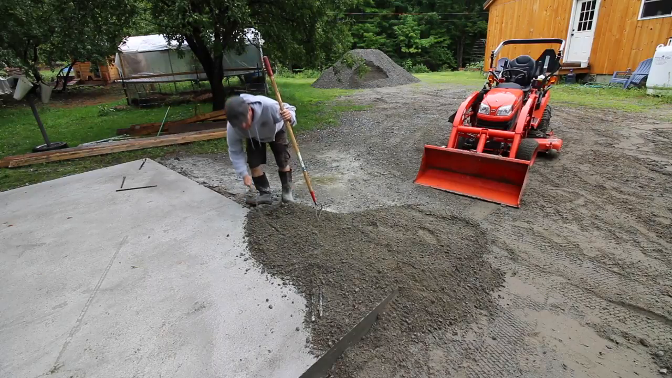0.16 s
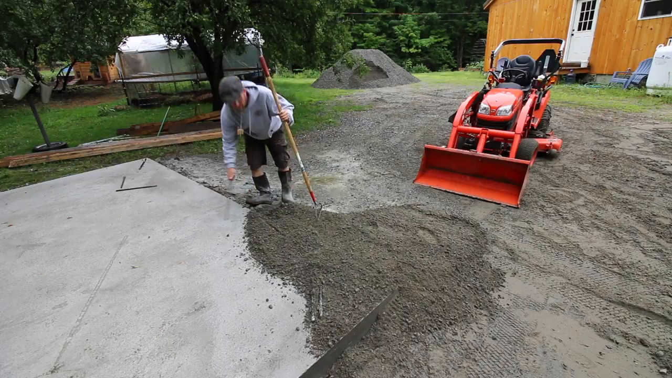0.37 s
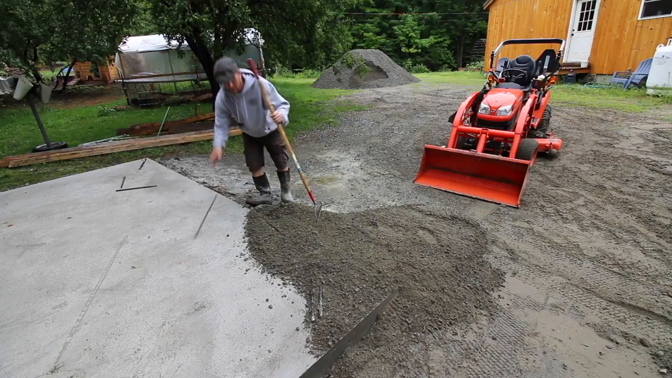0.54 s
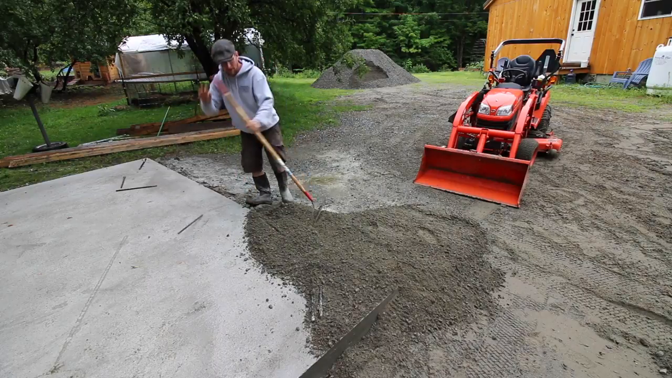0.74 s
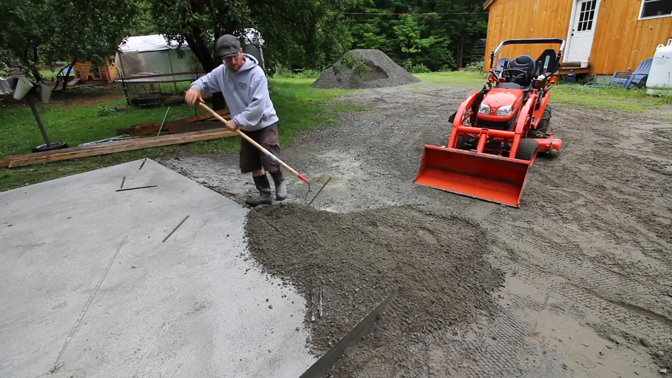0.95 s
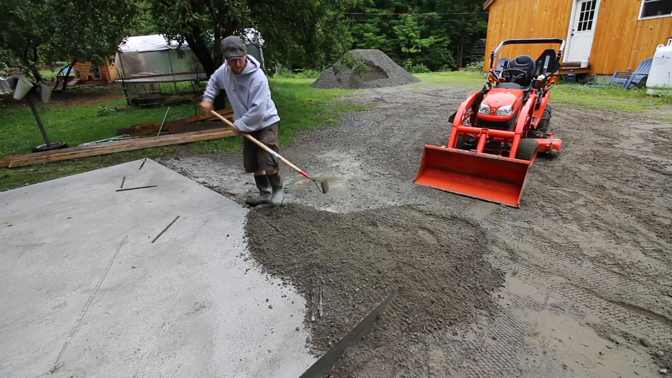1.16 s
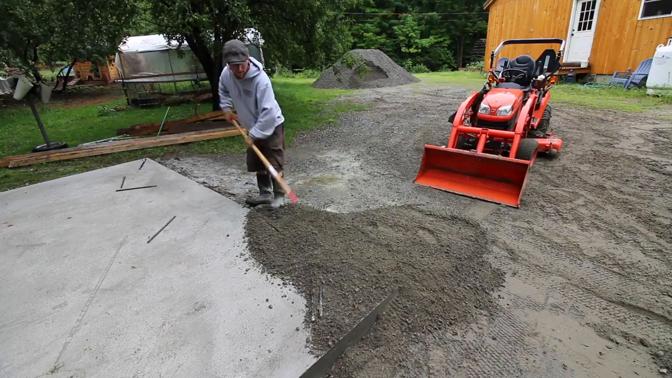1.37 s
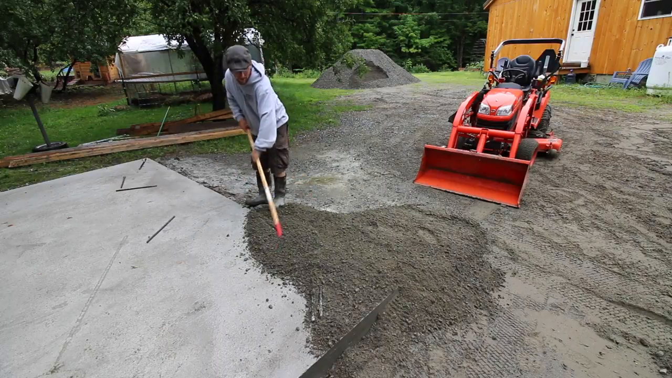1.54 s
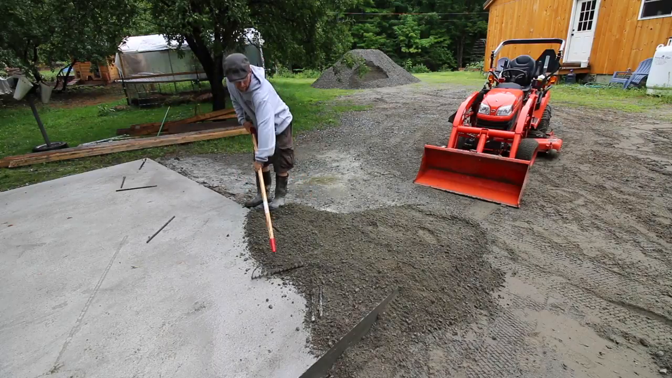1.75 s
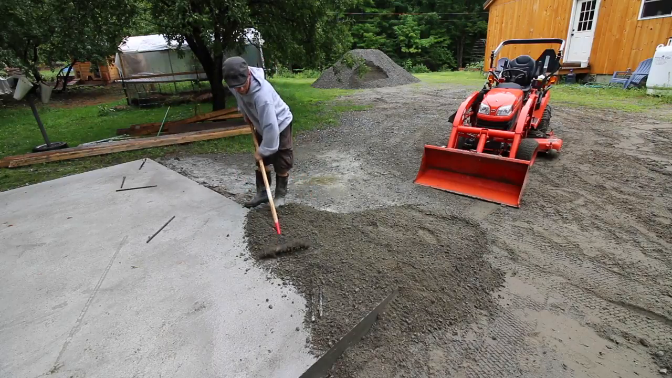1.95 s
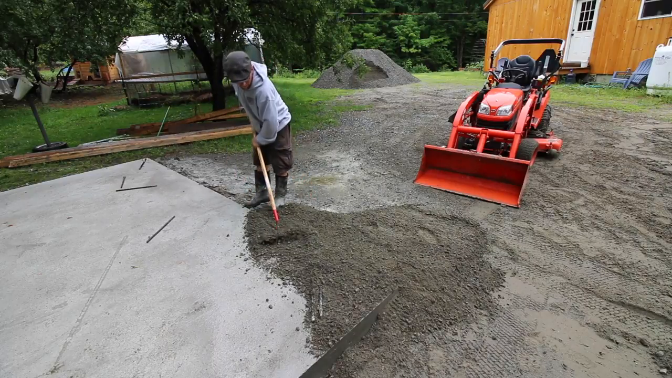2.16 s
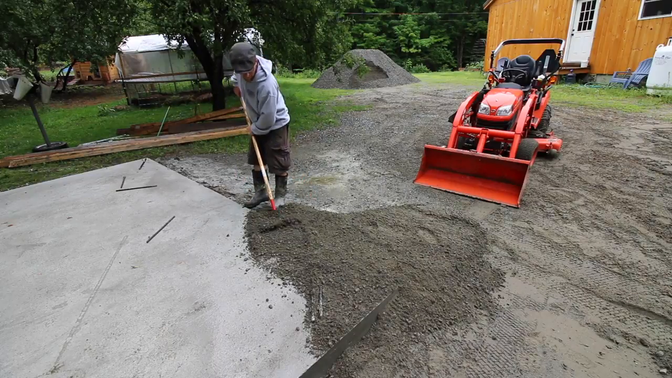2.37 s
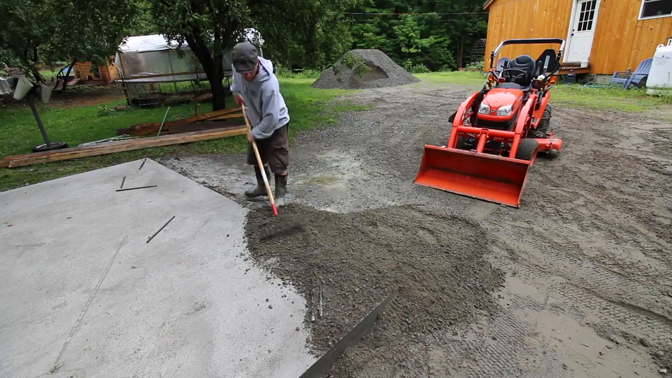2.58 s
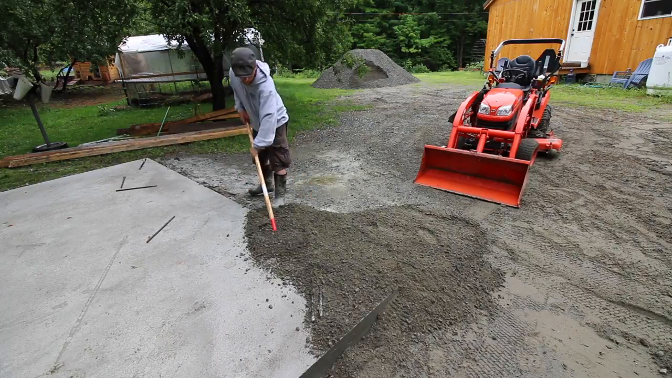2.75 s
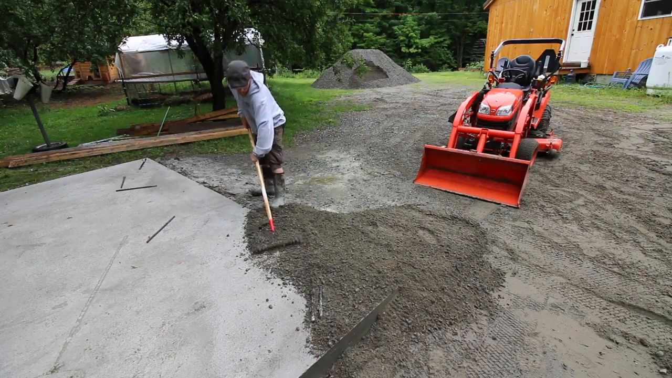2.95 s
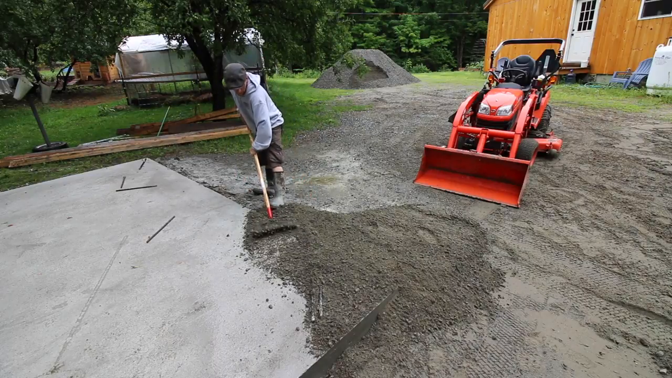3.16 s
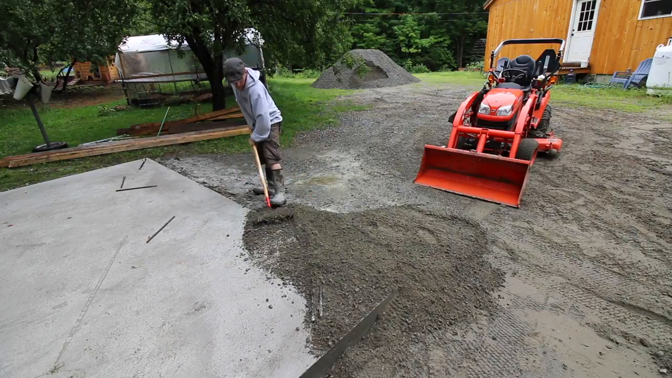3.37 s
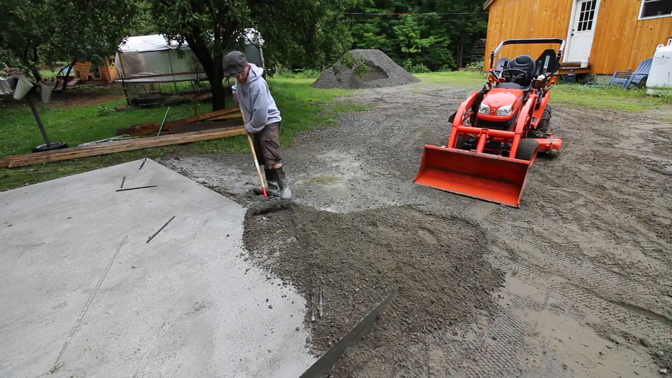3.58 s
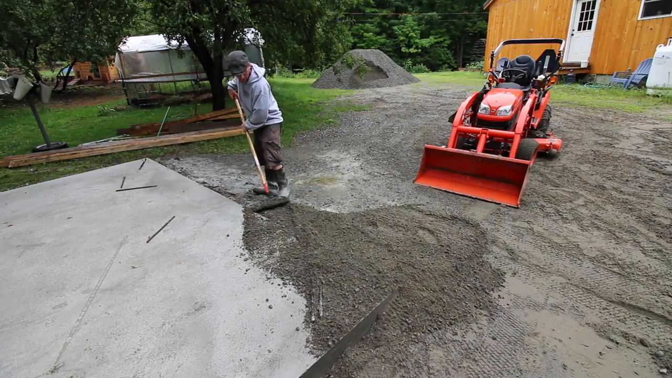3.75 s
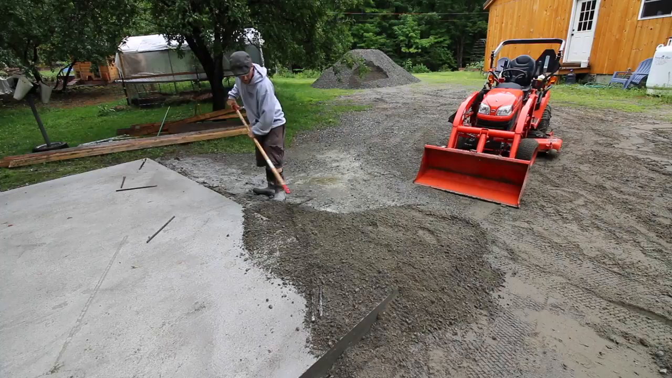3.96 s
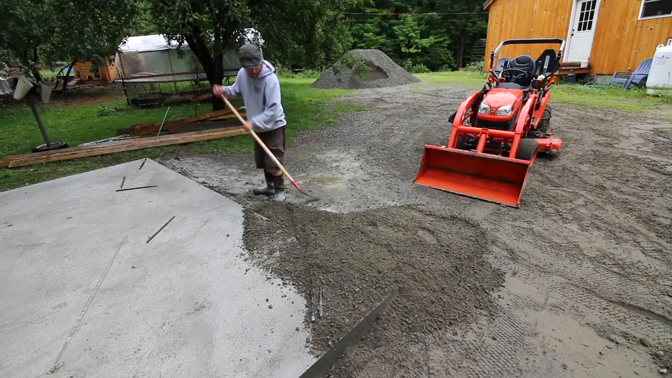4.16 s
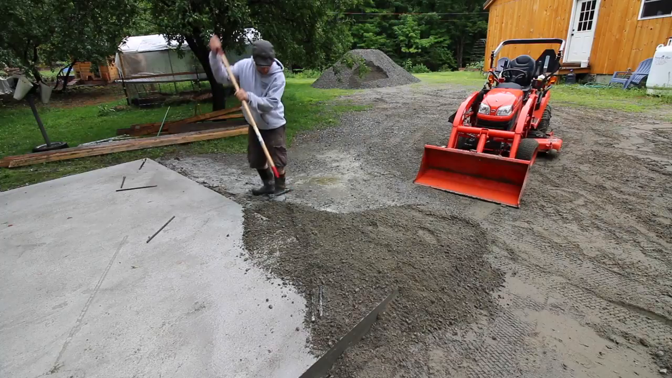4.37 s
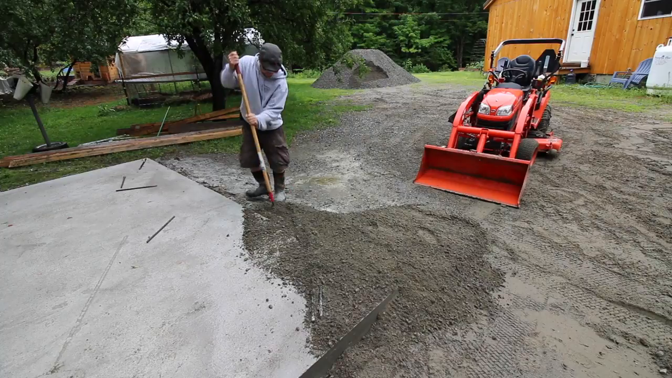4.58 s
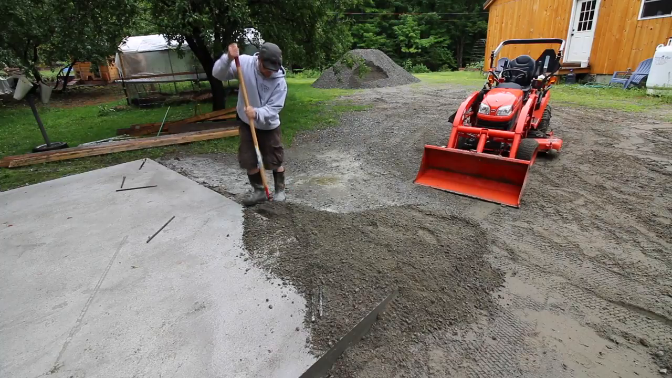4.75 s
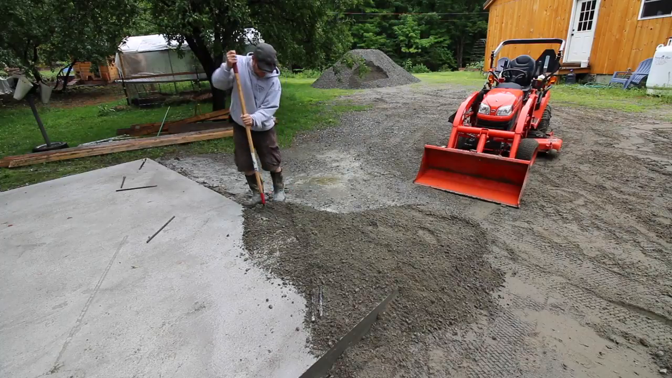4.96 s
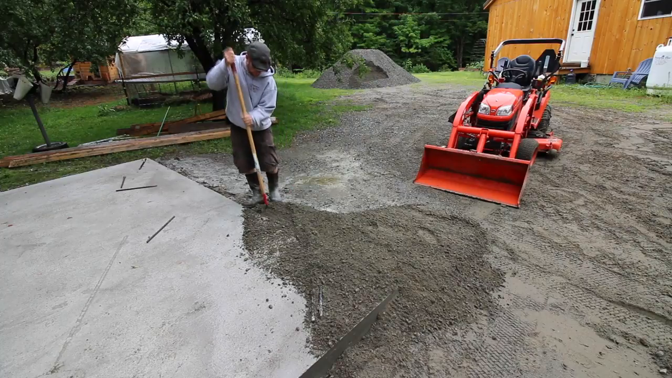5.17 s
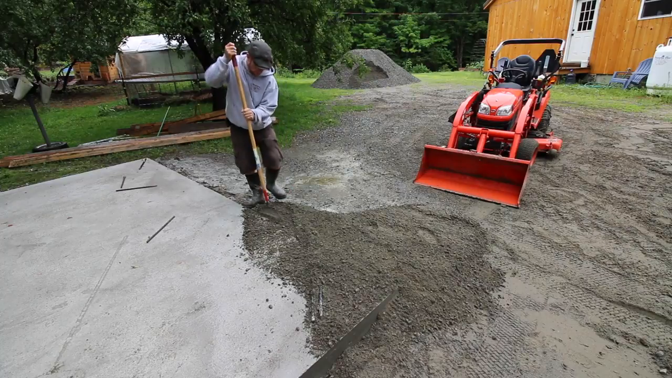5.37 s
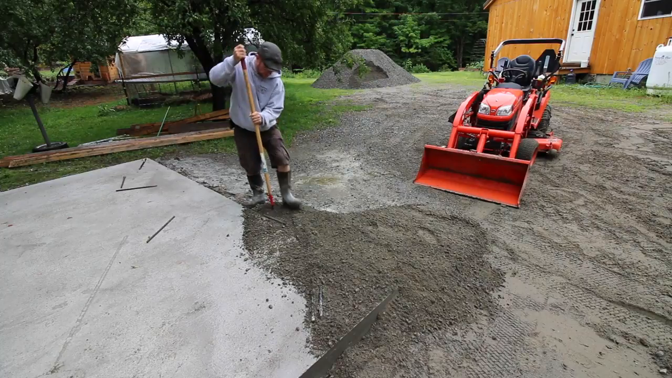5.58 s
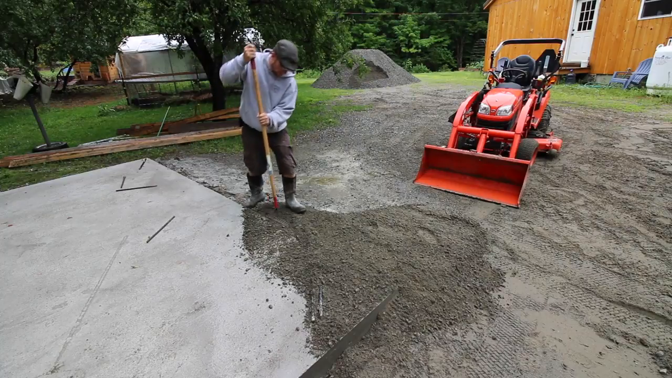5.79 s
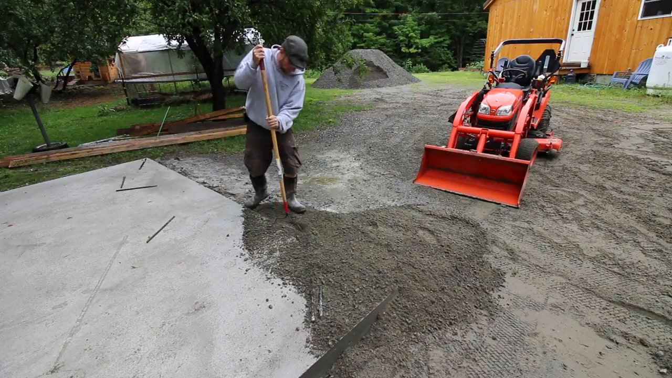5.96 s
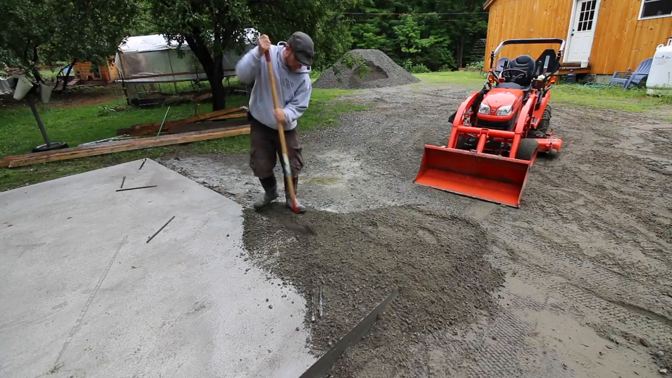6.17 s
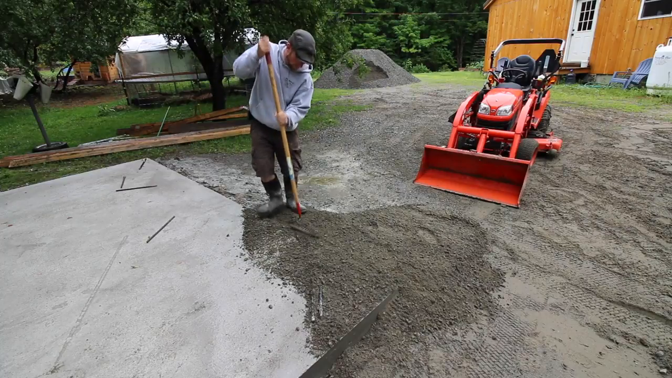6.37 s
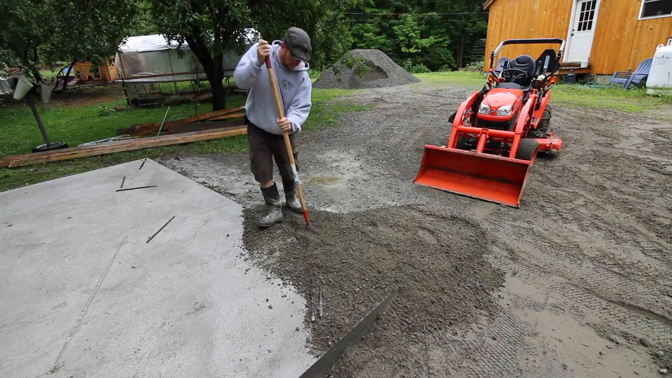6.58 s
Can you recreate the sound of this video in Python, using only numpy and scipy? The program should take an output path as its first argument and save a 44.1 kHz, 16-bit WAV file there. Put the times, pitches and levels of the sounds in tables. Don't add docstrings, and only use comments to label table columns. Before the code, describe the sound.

In a quiet yard, a steel rod is tossed onto concrete, landing with a bright clang and several quick bounces, its ring wavering as it spins. Boots shuffle on gravel. A steel rake then drags twice through loose stones, gritty and clattering, with tines ringing. After a short shuffle come uneven tamping blows, crunchy with dull metallic clanks. Close stereo from a few metres, over a soft airy hush.

```python
import sys
import numpy as np
from scipy import signal
from scipy.fft import rfft, irfft
from scipy.io import wavfile
from scipy.ndimage import uniform_filter1d

SR = 44100
rng = np.random.default_rng(int(sys.argv[2]) if len(sys.argv) > 2 else 0)


def level_to_linear(level):
    exponent = np.asarray(level, float) / 20
    return 10 ** exponent


def put_to_file(sound):
    columns = np.atleast_2d(sound).T
    safe = np.clip(columns, -1, 1)
    whole_steps = np.round(safe * 32767)
    wavfile.write(sys.argv[1], SR, whole_steps.astype(np.int16))


N = 292118


def curve(table, at, log=False):
    x, *columns = np.transpose(table)
    warp = np.log if log else np.asarray
    return np.array([np.interp(warp(at), warp(x), column) for column in columns])


def colour(x, table, lag_s=0.):
    hz = np.fft.rfftfreq(2048, 1 / SR) + 1
    cepstrum = irfft(np.log(level_to_linear(curve(table, hz, True)[0])))
    cepstrum[1:1024] *= 2
    cepstrum[1025:] = 0
    response = irfft(np.exp(rfft(cepstrum) - 2j * np.pi * hz * lag_s))
    return signal.fftconvolve(x, response)[:N]


def unit(x):
    return x / np.sqrt(np.mean(x ** 2))


def band(x, lo_hz, hi_hz):
    return signal.sosfilt(signal.butter(2, [lo_hz, hi_hz], "band", fs=SR, output="sos"), x)


def grains(rate, spread_db, dust):
    chance, luck = rng.random((2, N))
    size = level_to_linear(-spread_db * np.log(1 - .97 * luck)) * (chance < rate / SR)
    return (unit(size) + dust) * rng.standard_normal(N)


def flicker(rate, depth_db):
    hold = int(SR / rate)
    steps = np.repeat(rng.standard_normal(N // hold + 1), hold)
    return level_to_linear(depth_db * uniform_filter1d(steps, hold // 2)[:N])


def knocks(table, t60, width, grit):
    out = np.zeros(N + 4096)
    t = np.arange(4096) / SR
    for s, db, hz in table:
        push = rng.standard_normal(len(t)) * level_to_linear(-60 * t / t60) * grit
        push[0] += 4.
        lump = signal.iirpeak(hz, 1 / width, SR)
        knock = signal.lfilter(*lump, signal.lfilter(*lump, push))
        start = int(s * SR)
        out[start:start + len(t)] += level_to_linear(db) * knock / np.abs(knock).max()
    return out[:N]


def yard_air():
    # (f/Hz, level/dB per Hz)
    hush = [(12, -44), (20, -11.5), (117, 0.5), (794, -3), (913, -4), (994, 1), (1140, -3.5), (1840, -4.5),
            (5360, -20), (9410, -32), (14300, -41.5), (16500, -36)]
    breeze = flicker(6, 1.1)
    return [unit(colour(rng.standard_normal(N), hush)) * level_to_linear(-55.5) * breeze for _ in range(2)]


def shuffles(t):
    # (t/s, length/s, rattle level/dB, level of packed gravel giving way/dB)
    steps = [(0, 0.17, -50, -52.5), (0.528, 0.25, -48.5, -54), (0.84, 0.325, -44, -63),
             (1.222, 0.38, -52.5, -46), (1.584, 0.25, -55, -56), (2.477, 0.41, -52.5, -62),
             (3.768, 0.27, -46.5, -46), (4.072, 0.24, -45.5, -44.5), (4.344, 0.15, -50.5, -58.5),
             (4.648, 0.31, -44.5, -58), (4.987, 0.24, -46.5, -44), (5.29, 0.13, -45.5, -66),
             (5.65, 0.075, -46, -36.5), (5.804, 0.076, -46, -38.5), (5.864, 0.41, -45.5, -49),
             (6.27, 0.25, -50.5, -54.5)]
    step_s, settle_t60_s, sole_grit_db = 0.031, 0.31, -5
    s, length, rattle_db, packed_db = np.transpose(steps)[:, :, None]
    settling = level_to_linear(-60 * np.maximum(t - s - length, 0) / settle_t60_s)
    shape = np.clip((t - s) / step_s, 0, 1) * settling
    power = level_to_linear(2 * np.hstack([packed_db, rattle_db, rattle_db + sole_grit_db]))
    return np.sqrt(power.T @ shape ** 2)


def rod():
    # (f soft plane/Hz, f stiff plane/Hz)
    bend_hz = [(700, 772), (1363, 1490), (2241, 2433), (3313, 3610), (4600, 4978), (6075, 6535),
               (7725, 8308), (9505, 10270), (11475, 12355), (13565, 14600)]
    # (level/dB, level/dB, t60/s, t60/s)
    bend_ring = [(-24, -22, 1.6, 1.3), (-10, -10.5, 1.1, 1.4), (0.8, -2.9, 1.3, 1.4), (-3.5, -2, 1.45, .85),
                 (-9.5, -8.5, 1.5, 1.3), (-16.5, -13.5, 1.2, 1.0), (-20.5, -14.5, 1.3, 1.1),
                 (-27, -24, 1.0, .95), (-35.5, -30, .9, .8), (-38, -39, .7, .6)]
    # (f/Hz, level/dB, t60/s)
    axial_modes = [(3410, -23, .9), (6840, -28, .7), (5520, -34, .3), (11090, -40, .5), (7510, -32, 1.3)]
    # (t/s, blow level/dB, place along rod 0-1, share between planes 0-1, ring kept 0-1)
    bounces = [(.055, -48, .21, 0.45, .9), (.128, -43, .11, .1, .9), (0.156, -34.5, .13, .05, 1),
               (.674, -17, .469, .48, 1), (.7309, -10.5, .43, .76, .351), (.756, -16.3, .219, .405, .2),
               (.871, -25.2, 0, .496, .01), (.943, -22.9, .092, .271, .932),
               (.9539, -21.1, .249, .166, .474), (1.047, -25.8, .074, .405, .547),
               (1.185, -37.1, .089, .652, .426), (1.285, -36, .053, .502, .142), (1.372, -52, .1, .1, .45)]
    # (turns/s), 0 while held in the hand
    spins = [0, 0, 0, 3.36, 20, 22, 22, 14, 11, 10.5, 8, 5.5, 3.5]
    cracks = [-54, -51, -37, -10.5, -14, -21, -15.5, -21, -27, -26, -29, -47, -50]
    hardness = [0, 0, 0, 3, -3, 0, 0, 0, 0, 0, 0, 0, 0]
    hand_t60_s, hand_angle, drop_angle = .14, 2.49, 2.0
    tumble_hz, tumble_depth = 3.1, .6

    levels, t60s = np.split(np.array(bend_ring), 2, axis=1)
    bending = np.ravel(bend_hz), levels.ravel(), t60s.ravel()
    hz, db, t60 = np.hstack([bending, np.transpose(axial_modes)])
    k = np.arange(len(hz))
    axial, plane = k >= np.size(bend_hz), k % 2
    waves = np.where(axial, 6, 3 + k // 2)
    one_sided = np.interp(hz, [3350, 3600, 3900], [1, -.5, 0])[:, None]
    lobes = (tumble_depth * np.clip((hz - 3200) / 2000, 0, 1))[:, None]

    out, ring, angle = np.zeros(N), np.zeros(len(hz), complex), drop_angle
    starts = [int(b[0] * SR) for b in bounces] + [int(1.9 * SR)]
    for (s, blow_db, place, share, kept), spin, crack_db, hard_db, a, b in zip(
            bounces, spins, cracks, hardness, starts, starts[1:]):
        turn = share * np.pi / 2
        shape = np.cos(np.pi * waves * place) * np.where(plane, np.sin(turn), np.cos(turn))
        tilt_db = hard_db * np.log2(np.maximum(hz / 4000, 1))
        push = level_to_linear(blow_db + db + tilt_db) * np.where(axial, .7, shape)
        struck = kept ** (3.75 / waves) * ring + push
        pole = 2j * np.pi * hz - np.log(1000) / (t60 if spin else hand_t60_s)
        since = np.arange(b - a + 1) / SR
        contact = np.exp(-since / .0006)
        modes = (struck[:, None] + np.outer(ring - struck, contact)) * np.exp(np.outer(pole, since))
        heading = (angle if spin else hand_angle) + 2 * np.pi * spin * since
        facing = np.exp(1j * (heading - plane[:, None] * np.pi / 2))
        facing = facing.real + 1j * min(spin / 36., 1) * one_sided * facing.imag
        facing[axial] = 1
        tumble = np.cos(2 * np.pi * tumble_hz * np.outer(waves, since + s) + k[:, None] ** 2)
        sweep = 1 + (spin > 0) * lobes * tumble
        out[a:b] = (modes * facing * sweep).imag.sum(axis=0)[:-1]
        ring, angle = modes[:, -1], angle + 2 * np.pi * spin * since[-1]
        crack = rng.standard_normal(400) * np.exp(-np.arange(400) / 140.0)
        out[a:a + 400] += level_to_linear(crack_db) * band(band(crack, 1500, 3700), 530, 12000)
    return out


def rod_in_stereo(bar):
    # (f/Hz, level/dB)
    tilt = [(1400, 6.1), (2300, 2.6), (4000, 3), (6200, 1.5), (8000, 9.6), (14000, 4.7)]
    left = colour(bar, [(f, 0.85 * d / 2) for f, d in tilt])
    right = colour(bar, [(f, -1.5 * d / 2) for f, d in tilt], 6e-5)
    return np.array([left, right])


def slab_answers():
    # (t/s, peak level/dB, f/Hz)
    thumps = [
        (0.36, -48.5, 410),
        (0.7515, -28, 950),
        (0.587, -41.5, 650),
        (0.667, -40, 200),
        (0.7275, -25.5, 433),
        (0.869, -35, 270),
        (0.949, -29, 436),
        (1.058, -37, 375),
        (1.111, -48, 157),
        (1.184, -44, 382),
    ]
    return knocks(thumps, 0.034, 0.87, 1.0)


def struck_stones():
    # (t/s, peak level/dB, f/Hz)
    pebbles = [(0.3666, -40.5, 1740), (0.52, -39, 2440), (1.8377, -27, 1200), (1.8718, -20, 1850),
               (1.9127, -17, 1860), (1.9708, -36, 1600), (2.0258, -17, 2200), (1.8, -40, 910),
               (2.0594, -29, 1620), (3.5808, -21.5, 1900), (3.7254, -37, 1970), (3.739, -32, 2600),
               (4.459, -42, 2500), (3.9285, -29, 2500), (4.295, -39, 960), (4.2353, -34, 2000),
               (4.2697, -34, 1040), (2.254, -32, 1800), (3.549, -35, 947), (3.663, -33, 2020),
               (1.654, -41.5, 2100), (1.735, -42, 850), (4.8968, -24.5, 1880), (0.7302, -9.5, 2800),
               (6.4596, -29, 4200), (5.531, -20, 2200), (5.3777, -37, 3500), (5.972, -19, 4360)]
    return knocks(pebbles, 0.025, 0.61, 0.53)


def grit_ticks():
    # (t/s, peak level/dB, f/Hz)
    hand_grit = [(.5586, -48, 9070), (.5765, -43, 8930), (.5824, -46, 10500), (.6235, -40, 9050),
                 (.6354, -44, 7670), (.6594, -50, 8340)]
    # (t/s, peak level/dB, f/Hz)
    first_grit = [(1.9028, -33, 7660), (1.9248, -32, 7380), (1.9462, -33, 9480), (1.9602, -28, 9410),
                  (1.9986, -31, 8990), (2.0255, -22, 7810), (2.1043, -31, 8610), (2.1692, -40, 7780),
                  (2.1916, -38, 8760), (2.2116, -36, 8940), (2.246, -33, 8980), (2.267, -30, 9100),
                  (2.3174, -32, 7770), (2.3498, -36, 8590), (2.4146, -41, 8870)]
    # (t/s, peak level/dB, f/Hz)
    second_grit = [(3.0304, -21, 8100), (3.0533, -31, 8350), (3.2479, -33, 8610), (3.2798, -34, 8740),
                   (3.3855, -34, 8770), (3.4255, -41, 7920), (3.4409, -39, 8330), (3.4728, -34, 8190),
                   (3.5003, -30, 8440)]
    return level_to_linear(-1) * knocks([*first_grit, *second_grit, *hand_grit], .006, .7, 0.86)


def heels():
    # (t/s, peak level/dB, f/Hz)
    landings = [(0.728, -31, 196), (1.768, -50, 80), (3.999, -47, 152), (4.27, -44, 173),
                (4.479, -50.5, 91), (4.659, -49, 102), (4.884, -41, 128), (4.899, -31.5, 153),
                (5.048, -39, 185), (5.229, -36, 192), (5.278, -39, 181), (5.528, -37, 107),
                (5.783, -35, 182), (6.024, -49, 136), (6.311, -38, 164), (6.579, -49, 185)]
    return knocks(landings, 0.11, 1.0, 0.7)


def sole_thuds():
    # (t/s, peak level/dB, f/Hz)
    thuds = [(1.264, -39, 195), (1.285, -37, 390), (1.344, -32.5, 365), (1.384, -42, 427),
             (1.425, -32.5, 402), (2.166, -32, 397), (2.564, -41, 407), (2.909, -38, 315), (5.53, -37, 430),
             (3.284, -28, 422), (3.968, -39.5, 324), (4.216, -38.5, 386), (4.265, -39, 346),
             (4.629, -42, 346), (4.882, -39, 340), (4.896, -26.5, 513), (4.909, -53, 465), (5.03, -40, 300),
             (5.053, -37, 193), (5.111, -40, 345), (5.148, -38, 206), (5.205, -45, 298), (5.677, -39, 248),
             (5.687, -40, 330), (5.707, -38, 390), (5.843, -40, 398), (5.874, -39, 364), (6.212, -35, 460)]
    return knocks(thuds, .05, 0.65, 0.96)


def head():
    # (f/Hz, level/dB, t60/s)
    steel = [(851, -5.5, 0.18), (956, -3, 0.13), (1240, -6, 0.082), (1314, -5, 0.063), (1579, -6, 0.079),
             (1860, -1, 0.067), (2070, -5.5, 0.073), (2810, -14, .04), (3270, -16, 0.046)]
    # (t/s, level/dB, brightness/dB per octave)
    clanks = [
        (1.777, -29, 0.5),
        (2.962, -20.5, 3.5),
        (3.031, -26.5, -3),
        (4.984, -35, 2),
        (5.276, -33.5, -3.5),
        (5.52, -32, -1),
        (5.973, -41.5, -11),
        (6.024, -29, -4),
        (6.303, -33, -5),
        (6.46, -46, -7),
    ]
    jolt_s, buried_from_s, buried_ring = 0.008, 4.4, .55
    out, t = np.zeros(N + SR // 4), np.arange(SR // 4) / SR
    for s, db, bright_db in clanks:
        jolt = rng.standard_normal(len(t)) * np.exp(-t / jolt_s) * np.minimum(t / 0.0018, 1)
        keep = buried_ring if s > buried_from_s else 1
        ring = 0
        for hz, mode_db, t60 in steel:
            level = level_to_linear(mode_db + bright_db * np.log2(hz / 1400) - 60 * t / (t60 * keep))
            ring = ring + level * np.sin(2 * np.pi * hz * t)
        clank = signal.fftconvolve(ring, jolt / np.linalg.norm(jolt))[:len(t)]
        out[int(s * SR):][:len(t)] += level_to_linear(db) * clank
    return band(out[:N], 500, 7000)


def blows(t):
    # (t of full bite/s, peak level/dB, low level/dB, high level/dB, time the tines take to bite/s)
    bites = [(1.779, -24.5, -7, -9, 0.018), (1.836, -28, -18, -25, 0.013), (1.875, -30, -16, -31, 0.0018),
             (1.916, -29, -20, -8, .002), (1.968, -24, -14, 4.5, 0.009), (2.027, -26, -26, -16, 0.0094),
             (2.277, -27, -11, 1, 0.0091), (2.06, -33, -11, -10, .006), (2.956, -33, 0, -12, 0.0027),
             (2.964, -21.5, -8.5, 5, 0.004), (6.586, -33, -12, -2, .003), (6.295, -41, -15, 3, 0.0073),
             (6.04, -41, -25, 6, .002), (3.55, -46, -2, -4, .006), (4.671, -23, -10, -4, .006),
             (3.031, -30, -9, 7, 0.0041), (4.661, -20, -21, 2, 0.0049), (4.986, -20, -26, 2, 0.01),
             (5.277, -21.5, -12.5, 1.5, 0.009), (5.519, -27, 3, 0, 0.0078), (5.529, -16.5, -10, -7, 0.0055),
             (5.55, -27.5, -14, -1, 0.0042), (5.741, -27, -23, 4, 0.0029), (5.752, -31.5, -12, -2, 0.011),
             (5.972, -30, -46, -30, 0.00089), (6.02, -19.5, -8, 3, 0.012), (6.03, -20, -17, 1, 0.013),
             (6.038, -39, 5, -21, 0.0045), (6.301, -18, -10, 11.5, 0.0028), (6.46, -32, -39, -6, 0.0022),
             (6.572, -16.5, -16.5, 3.5, 0.0035)]
    hold_s, crunch_t60_s, debris_db, debris_t60_s = 0.0013, 0.077, -20.5, 0.26
    gain = np.zeros((3, N))
    for s, db, low_db, high_db, bite in bites:
        a = int((s - bite) * SR)
        since = t[:min(SR // 2, N - a)]
        after = np.maximum(since - bite, 0)
        crunch = level_to_linear(-60 * np.maximum(after - hold_s, 0) / crunch_t60_s)
        crunch += level_to_linear(debris_db - 60 * after / debris_t60_s)
        crunch *= np.minimum(since / bite, 1) ** 2
        late = np.interp(since - .005, since, crunch)
        crunch += 0.089 * (after > 0) * level_to_linear(-60 * after / 0.0045)
        dust = crunch ** 1.44
        level = level_to_linear(db + np.array([[low_db], [0], [high_db]]))
        gain[:, a:a + len(since)] += level * np.array([late, crunch, dust])
    return gain


def pulls(t):
    # (t/s, drag level/dB, extra weight on the head/dB)
    drags = [
        [(1.8, -51, 21), (1.87, -35, 2.5), (1.96, -26, -4.5), (2.04, -24.5, -1.5), (2.17, -31, -0.5),
         (2.29, -28, 5), (2.44, -36, 5), (2.48, -47, 5)],
        [(2.96, -35, -3), (3.0, -28, 3.5), (3.05, -25, -0.5), (3.14, -24, 3), (3.295, -27, 6.5),
         (3.315, -32.5, 4), (3.43, -33.5, 5.5), (3.55, -31, 2.5), (3.67, -36.5, 4.5)],
    ]
    grit_db, rumble_db, lift_db_per_s = -2, -9.5, 131
    gains = []
    for table in drags:
        drag_db, weight_db = curve(table, t)
        drag_db = drag_db - lift_db_per_s * np.maximum(t - table[-1][0], 0)
        bands_db = np.array([drag_db + rumble_db + weight_db, drag_db, drag_db + grit_db])
        gains.append(level_to_linear(bands_db) * (t >= table[0][0]))
    return gains


def effort(t):
    moving = pulls(t) + [shuffles(t)]
    together = np.sqrt(np.sum(np.square(moving), axis=0)) + 1e-9
    return together * flicker(70, 1.3) + blows(t)


def gravel(gain):
    # (f/Hz, level/dB per Hz)
    rattle = [(35, -60), (60, -16.5), (297, -0.5), (659, -3.5), (961, -21), (1430, -10.5), (1570, -12.5),
              (3670, -10.5), (4030, -11.5), (5470, -13), (8750, -20), (10900, -35.5), (14800, -43)]
    bands_hz = np.minimum(60 * 2 ** np.arange(0, 8.5, .75), 14800)
    shape = curve(rattle, bands_hz, True)[0] + 10 * np.log10(bands_hz)
    reach = np.interp(np.log(bands_hz), np.log([400, 1000, 4200, 7000]), [0, 1, 1, 2])
    catch = grains(600, 3.9, 1.0)
    out = 0
    for hz, db, r in zip(bands_hz, shape, reach):
        k = min(int(r), 1)
        ticks = (grains(hz / 2, 3, 1.) + catch) * flicker(80, 2.2)
        blend = gain[k] ** (1 - r + k) * gain[k + 1] ** (r - k)
        out = out + level_to_linear(db) * blend * unit(band(ticks, hz / 1.54, hz * 1.326))
    return level_to_linear(-35.5) * band(out, 75, 19000)


def tines(t, stones):
    # (f/Hz, width/Hz, level over the gravel/dB)
    stages = [
        [(958, 110, 1), (1570, 90, 1), (1890, 80, 2), (2370, 90, 1), (3210, 130, -1)],
        [(3000, 500, 0), (4100, 700, -1)],
        [(958, 110, 1), (1890, 80, 2)],
        [(947, 80, 3), (1580, 90, 3), (1870, 80, 1), (3140, 70, -1), (3990, 130, 11), (4760, 120, 2)],
        [(1000, 90, -1), (1990, 300, -4), (3140, 120, -6)],
        [(960, 120, 3), (1600, 150, 3), (2050, 200, 4), (3140, 120, 1)],
        [(1000, 90, -1), (1990, 300, -4)],
        [(950, 130, -3), (2120, 250, -9), (3300, 250, -4)],
        [(2500, 300, -4), (3600, 300, -4)],
    ]
    stage_starts = (2.09, 2.9, 3.015, 3.305, 3.545, 3.7, 4.4, 6.42)
    depth, ring = np.searchsorted(stage_starts, t), 0
    for k, modes in enumerate(stages):
        struck = (depth == k) * stones
        for f, width, db in modes:
            touch = struck * flicker(35, 2.5)
            ring = ring + level_to_linear(db) * signal.lfilter(*signal.iirpeak(f, f / width, SR), touch)
    return ring


def rake(t, gain):
    stones = gravel(gain)
    return stones + tines(t, stones)


def flying_chips():
    # (t/s, peak level/dB, f/Hz)
    chips = [(2.838, -38, 7850), (4.127, -39, 8800), (4.2946, -40.5, 9650), (5.4111, -41, 8620),
             (5.9282, -35, 8700), (6.2587, -39, 8240), (6.4596, -31.5, 9200), (6.5513, -39, 7700)]
    return knocks(chips, 0.0073, 0.19, 0.5)


def tipping_stones():
    # (t/s, peak level/dB, f/Hz)
    snaps = [(3.398, -33, 436), (3.428, -31.5, 431), (5.012, -29.5, 503), (5.023, -29.5, 388),
             (5.0505, -24.5, 500), (5.123, -32, 425), (5.226, -26, 500), (5.232, -29.5, 401),
             (5.7805, -23, 450)]
    return knocks(snaps, .012, 1.35, .15)


def skitter(t):
    # (t/s, length/s, level/dB, f/Hz, width/Hz)
    skating = (6.195, .095, -51, 8200, 700)
    s, length, db, hz, width = skating
    ticks = grains(900, 3, .5) * (t > s) * level_to_linear(-60 * np.maximum(t - s - length, 0) / .05)
    return level_to_linear(db) * 4 * band(ticks, hz - width / 2, hz + width / 2)


def ground(x):
    return x + 0.32 * np.roll(x, 4)


def walls(x, t60, db):
    t = np.arange(SR // 2) / SR
    tails = rng.standard_normal((2, len(t))) * level_to_linear(-60 * t / t60) * (t > .012)
    return level_to_linear(db) * np.array([signal.fftconvolve(x, tail / np.linalg.norm(tail))[:N] for tail in tails])


def microphones(shared, unshared):
    # (f/Hz, level/dB)
    tilt = [(100, 1.2), (700, 0), (1500, 1.5), (5000, 0), (14000, 4.5)]
    # (f/Hz, level/dB)
    apart = [(30, -18), (130, -22.5), (400, -22.5), (1500, -18), (5000, -7.5), (14000, 4.5)]
    side = colour(unshared, apart)
    left = colour(shared + side, [(f, d / 2) for f, d in tilt])
    right = colour(shared - side, [(f, -d / 2) for f, d in tilt], 5e-5)
    return np.array([left, right])


def scene():
    t = np.arange(N) / SR
    air = yard_air()
    gain = effort(t)
    bar = level_to_linear(3) * rod()
    hits = slab_answers() + struck_stones() + grit_ticks() + heels() + sole_thuds()
    hits += head() + flying_chips() + tipping_stones() + skitter(t)
    near = ground(rake(t, gain) + hits)
    near_side = ground(rake(t, gain) + 0.88 * np.roll(hits, 9))
    direct = microphones(near + air[0], near_side + 4.8 * air[1]) + rod_in_stereo(bar)
    return direct + walls(band(near + bar, 940, 12200), 0.53, -12.0)


def low_pass(x):
    return signal.sosfilt(signal.butter(12, 16990, fs=SR, output="sos"), x)


def record(dry):
    cut = signal.sosfilt(signal.ellip(8, .2, 70, 16000, fs=SR, output="sos"), dry)
    return low_pass(cut)


dry = scene()
out = record(dry)
put_to_file(out)
```